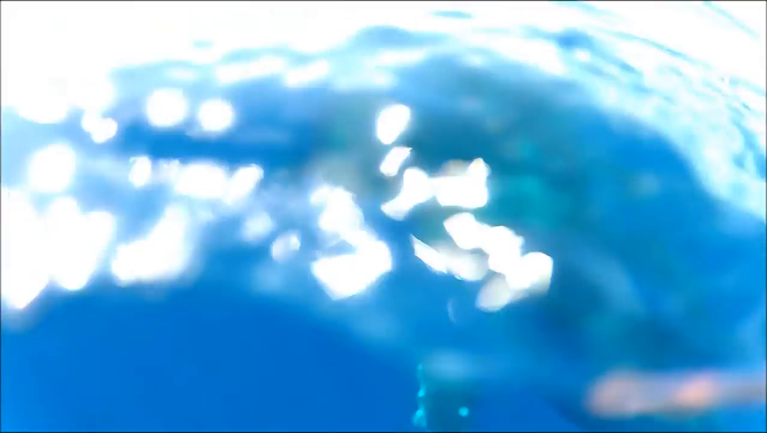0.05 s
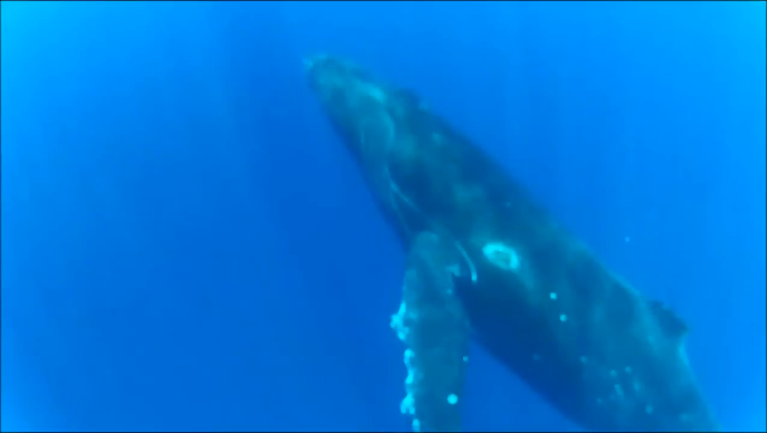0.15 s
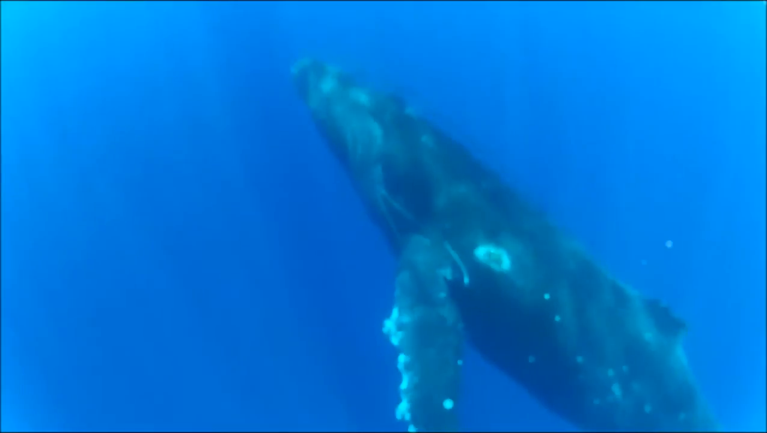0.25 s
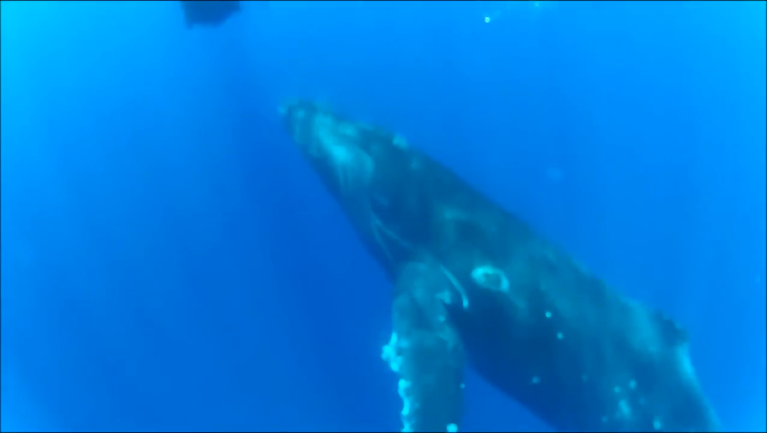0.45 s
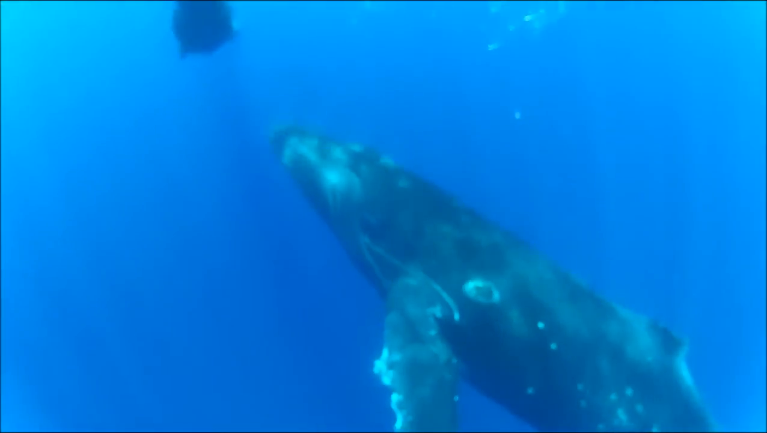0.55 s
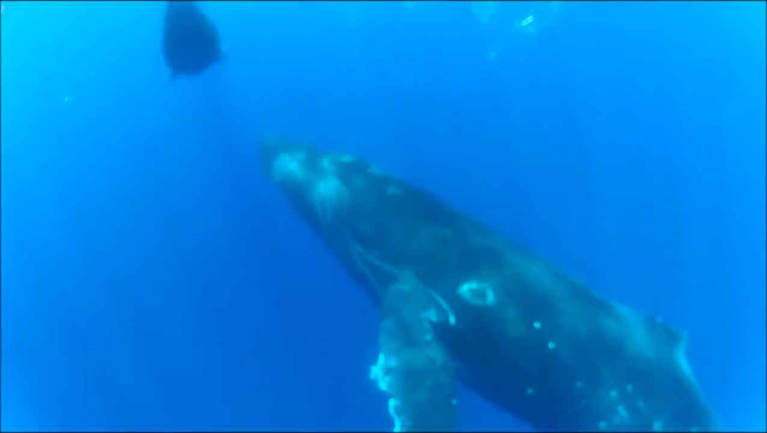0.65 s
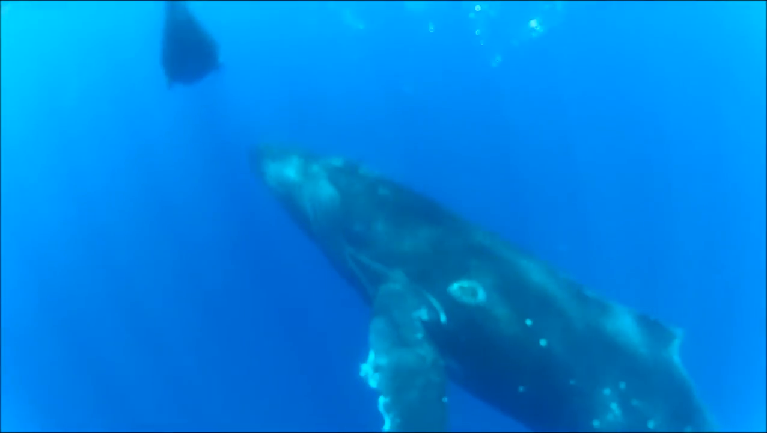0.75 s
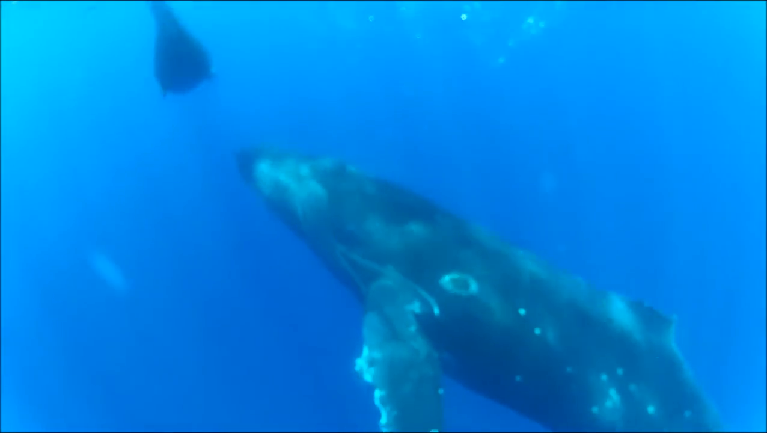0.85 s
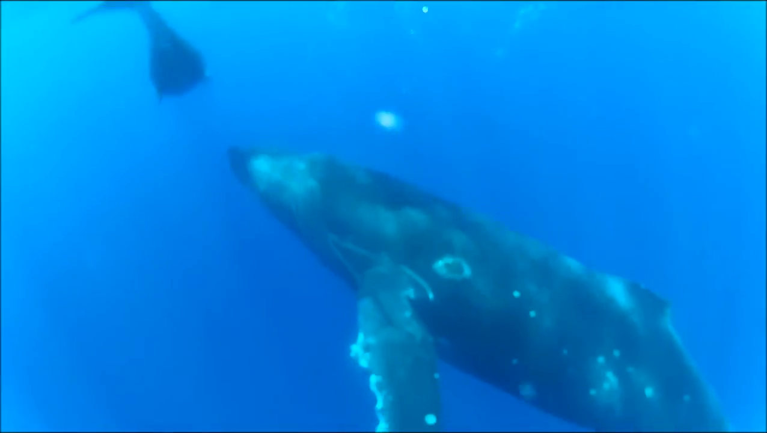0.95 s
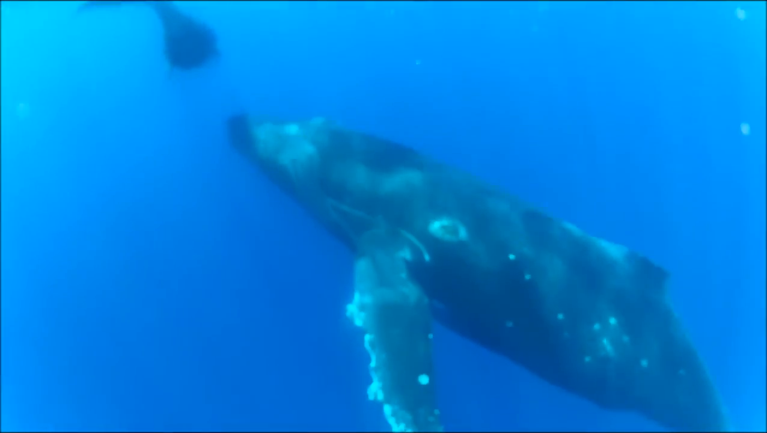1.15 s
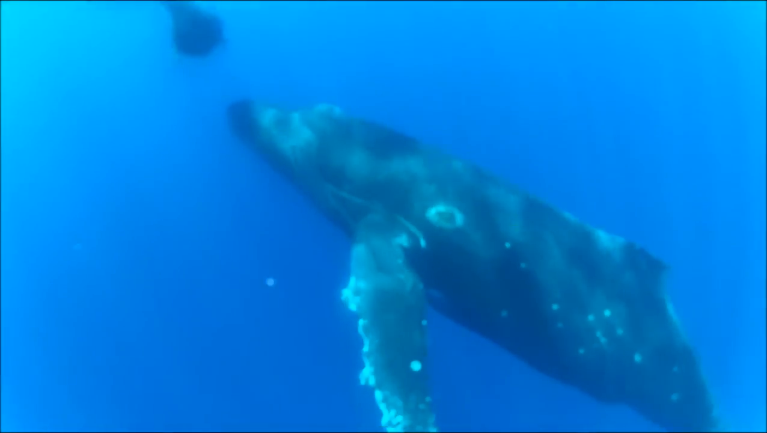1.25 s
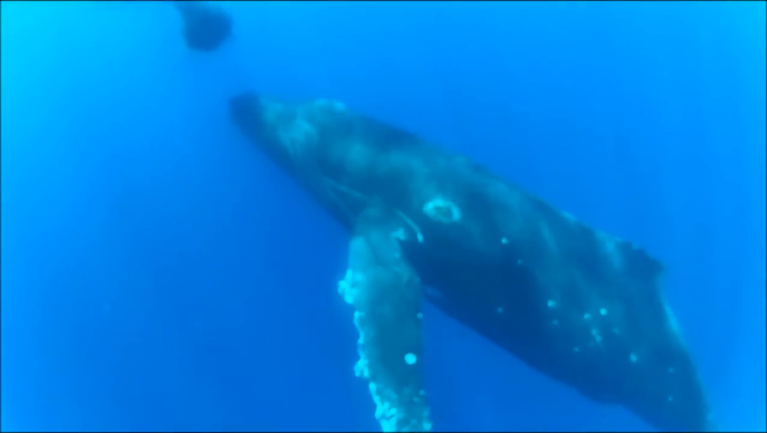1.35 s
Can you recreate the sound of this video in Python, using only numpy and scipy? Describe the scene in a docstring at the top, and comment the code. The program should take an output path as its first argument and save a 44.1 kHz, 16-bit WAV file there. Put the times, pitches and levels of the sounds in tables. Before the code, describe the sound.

Loud, glassy water plops and knocks hit a waterproof camera case as it is dipped into the sea. After half a second they give way to a quiet, low underwater wash with faint fizz, lone bubbles and ticks.

```python
"""Loud, glassy plops and knocks for half a second, then a low wash, faint fizz, lone bubbles and ticks.
A camera in a waterproof housing is dipped into the sea: trapped air pinches off as ringing bubbles,
water knocks on the case and shoves it. The recorder rounds the peaks and holds each sample
at a low rate, which gives every plop its glassy mirror tone."""
import sys
import numpy as np
from scipy import signal
from scipy.fft import rfft, irfft
from scipy.io import wavfile

SR = 44100
rng = np.random.default_rng(int(sys.argv[2]) if len(sys.argv) > 2 else 0)


def master_out(mix):
    """Clip the mix to full scale and print it as 16-bit PCM to the path in sys.argv[1]."""
    frames = np.transpose(np.atleast_2d(mix))
    ceiling = np.clip(frames, -1, 1)
    pcm = np.round(ceiling * 32767).astype(np.int16)
    wavfile.write(sys.argv[1], SR, pcm)


N = 61739
T = np.arange(N) / SR


def undb(db):
    """Decibels to gain."""
    return 10 ** (np.asarray(db) / 20)


def unit(x):
    """Scale to rms 1."""
    return x / np.sqrt(np.mean(x ** 2))


def curve(points):
    """Gain over time from (t/s, level/dB) points."""
    return undb(np.interp(T, *np.array(points).T))


def noise(colour):
    """Noise of rms 1 shaped by (f/Hz, density/dB) points, rolled off below the first."""
    hz, db = np.array(colour).T
    bins_hz = np.maximum(np.fft.rfftfreq(N, 1 / SR), 1)
    shape = undb(np.interp(np.log(bins_hz), np.log(hz), db))
    low_cut = np.minimum(bins_hz / hz[0], 1)
    return unit(irfft(rfft(rng.standard_normal(N)) * shape * low_cut, N))


def add(out, start_s, sound):
    """Mix a sound in at start_s."""
    i = min(max(int(start_s * SR), 0), N)
    out[i:i + len(sound)] += sound[:N - i]


def ring(hz, t60_ms, rise_ms, glide=0):
    """Damped sine, envelope peak 1; pitch slides by the fraction glide over one t60."""
    t_ms = np.arange(6000) * 1000 / SR
    age = t_ms / t60_ms
    envelope = (1 - np.exp(-t_ms / rise_ms)) * np.exp(-np.log(1000) * age)
    pitch_hz = hz * (1 + glide * np.minimum(age, 1))
    return envelope / envelope.max() * np.sin(2 * np.pi * np.cumsum(pitch_hz) / SR)


def sea():
    """Low, slowly heaving wash, plus water churning round the case; stereo."""
    # wash spectrum: f/Hz, relative density/dB
    wash_colour = [(12, -27.5), (20, 0), (64, -2), (81, -3.5), (259, -17.5), (447, -26), (772, -32),
                   (1080, -36.5), (1810, -38.5), (2040, -30.5), (2350, -36.5), (2920, -40.5), (3280, -39.5),
                   (5150, -43.5), (5800, -54.5), (7540, -84), (12800, -120)]
    # wash heave: t/s, gain/dB
    heave = [(0, -4), (.3, 1.5), (.6, 1.5), (.9, 1), (1.0, 0.5), (1.15, 1), (1.4, 2)]
    # churn spectrum: f/Hz, relative density/dB
    churn_colour = [(40, -9), (120, -5), (220, 9), (400, -6.5), (900, -8.5), (2100, -18.5), (3200, -25),
                    (5800, -23.5)]
    # churn envelope: t/s, level/dB
    churn_levels = [(0, -53.5), (.1, -54), (.24, -51), (.34, -57.5), (.44, -56), (.52, -46.5), (.58, -73),
                    (1.1, -72), (1.19, -57.5), (1.26, -72), (1.4, -73.5)]
    wash_db, side_db = -51, -71
    wash = undb(wash_db) * curve(heave) * noise(wash_colour)
    side = undb(side_db) * noise(wash_colour)
    churn = noise(churn_colour) * curve(churn_levels)
    return wash + churn + side * np.array([[1], [-1]])


def fizz():
    """Random swarm of tiny ringing bubbles, loudest while the case goes under."""
    # swarm envelope: t/s, level/dB
    levels = [(0, -49.5), (.04, -48.5), (.11, -60.5), (.2, -57.5), (.33, -55), (.39, -46.5), (.44, -49),
              (.49, -61.5), (.54, -66), (.6, -75.5), (1.0, -77.5), (1.12, -67), (1.19, -55), (1.25, -71.5),
              (1.3, -61), (1.4, -75)]
    count, centre_hz, spread_oct, t60_cycles, scatter_db = 2000, 1850, .51, 12, 4.5
    out = np.zeros(N)
    starts_s = rng.uniform(0, N / SR, count)
    for start_s, (pitch, strength, slide) in zip(starts_s, rng.standard_normal((count, 3))):
        hz = centre_hz * 2 ** (spread_oct * min(pitch, 2))
        bubble = ring(hz, t60_ms=1000 * t60_cycles / hz, rise_ms=.4, glide=.12 * slide)
        add(out, start_s, undb(scatter_db * min(strength, 2)) * bubble)
    return unit(out) * curve(levels)


def foam():
    """Brief hiss as the last pocket of air collapses."""
    # foam spectrum: f/Hz, relative density/dB
    colour = [(300, -3.5), (900, 2.5), (2200, 1), (3500, -2), (5800, -10), (9000, -38.5)]
    start_s, level_db, t60_s = .426, -34, .09
    out = np.zeros(N)
    add(out, start_s, undb(level_db) * noise(colour) * np.exp(-np.log(1000) * T / t60_s))
    return out


def thumps():
    """Water shoves the housing: heavily damped low pressure swings."""
    # shoves: t/s, level/dB, f/Hz, t60/ms
    shoves = [(.0050, -46.5, 218, 140), (.0905, -37.5, 490, 19), (0.2221, -40, 560, 19),
              (0.2589, -34, 236, 25), (0.3, -31.5, 203, 12.4), (0.3556, -14.5, 140, 9.7),
              (0.477, -32, 199, 45), (.4800, -37.5, 327, 20), (0.504, -34.5, 93.3, 23),
              (0.5139, -24, 227.3, 5.3), (0.6255, -32.5, 209.4, 7.4), (0.927, -49, 400, 6.2),
              (1.0530, -44, 150, 20)]
    out = np.zeros(N)
    for start_s, db, hz, t60_ms in shoves:
        add(out, start_s, undb(db) * ring(hz, t60_ms, rise_ms=2))
    return out


def knocks():
    """Water strikes the housing: crack, spit of noise, case ring. Low knocks miss the upper modes."""
    # water impacts: t/s, crack level/dB, crack f/Hz, crack t60/ms, contact/ms
    impacts = [ (0.0121, -40, 3550, 2.7, .1), (.0290, -30, 4640, 2.7, .1),
               (0.0394, -29.5, 5530, 4.9, 0.088), (.0638, -30, 3730, 1.4, 0.087),
               (0.1839, -34, 1850, 4, 0.039), (0.1876, -37, 1780, 6, 0.046), (0.2, -36, 1030, 11, .05),
               (.2175, -49, 3000, 3.4, .1), (0.221, -29.5, 1485, 1.3, 0.045), (.2390, -31, 2040, 3, .1),
               (.2583, -3, 4930, 5.9, 0.1), (.2584, -10, 3550, 9.5, 0.36), (0.3012, -23.5, 900, 4.2, 0.084),
               (0.3088, -14.5, 3760, 8.7, 0.44), (0.309, -12.5, 2620, 6.4, 0.28),
               (0.3215, -37, 3660, 8.1, 0.11), (0.3541, -12.5, 4410, 5.7, .1), (.3550, -17.5, 460, 8, .2),
               (0.4024, -11, 3800, 1.4, 0.062), (.4610, -36, 2200, 3.9, .05), (.4757, -21, 2930, 2.9, 0.46),
               (0.8827, -51.5, 3009, 6, 0.26), (0.9583, -38, 1245, 9.8, .2), (1.0550, -32, 2400, 5, 0.033),
               (1.1840, -30.5, 4004, 7.7, 0.9), (1.1838, -40, 2520, 7.3, .3), (1.2135, -47, 2098, 3, .05),
               (1.3047, -34.5, 1940, 6, .04)]
    # housing modes: f/Hz, relative level/dB, t60/ms
    modes = [(970, -6, 15), (1712, -2.5, 10), (2472, -10, 26), (3830, -6.5, 8.1), (4720, -4.5, 18),
             (4840, -13, 24)]
    case_gain_db, spit_gain_db, spit_t60_ms, hard_contact_ms = -14, -8.5, 20, .1
    out = np.zeros(N)
    for start_s, db, hz, t60_ms, contact_ms in impacts:
        crack = ring(hz, t60_ms, contact_ms)
        reach_hz = 2 * hz  # excitation bandwidth
        case = sum(undb(mode_db) / (1 + (mode_hz / reach_hz) ** 4) * ring(mode_hz, mode_ms, contact_ms)
                   for mode_hz, mode_db, mode_ms in modes)
        lowpass = signal.butter(2, reach_hz, fs=SR, output="sos")
        spit = signal.sosfilt(lowpass, rng.standard_normal(len(case)))
        spit *= np.exp(-np.log(1000) * T[:len(case)] * 1000 / spit_t60_ms)
        spit /= 1 + contact_ms / hard_contact_ms  # hard contacts spit most
        add(out, start_s, undb(db) * (crack + undb(case_gain_db) * case + undb(spit_gain_db) * spit))
    return out


def bubbles():
    """Each air bubble rings as it pinches off; its pitch slides as it moves past the case."""
    # bubbles: t/s, f/Hz, level/dB, t60/ms, pinch-off/ms, glide/fraction per t60
    plops = [ (.0201, 3614, -25.5, 13.6, 1.3, -0.13), (0.0196, 1766, -28.5, 21, 3, 0.41),
             (0.0285, 2470, -27.5, 19, 2.4, 0.021), (0.0307, 1710, -31, 9.5, 0.4, -.3),
             (0.0396, 2110, -18, 11.6, 0.26, 0.26), (0.0387, 2775, -24.5, 24, 0.059, -0.39),
             (0.05, 1860, -16.5, 7, 1.6, -0.28), (.0505, 2100, -25.5, 21, 2.0, -0.38),
             (0.0566, 924, -22.5, 23, 2.2, 0.15), (.0740, 1450, -42.5, 20, 0.82, -0.46),
             (.0903, 1710, -12, 8.9, 2.2, -0.23), (0.0936, 1620, -29.5, 16, 0.72, 0.25),
             (0.1441, 1620, -28, 2.7, 0.52, -0.079), (.1486, 2096, -29.5, 32, .1, -0.012),
             (0.258, 1007, -11.5, 13.4, 0.6, 0.24), (0.2787, 1740, -30, 10.4, 0.71, 0.61),
             (0.321, 1870, -35.5, 11, 1.2, .15), (.3543, 1840, 7, 10.2, 0.92, -0.13),
             (.3560, 948, -2.5, 14.6, 0.34, -0.15), (0.377, 2260, -28, 11, 0.883, 0.42),
             (0.3769, 1379, -32, 5.8, 1.5, -0.16), (.3870, 937, -34.5, 17, 0.4, -0.18),
             (0.3948, 1090, -30, 8.7, .6, .1), (.4023, 940, -27, 13, 0.43, 0.47),
             (0.4201, 755, -8, 14.7, 1.2, -0.75), (0.4194, 1770, -18.5, 13, 2.0, .5),
             (.4250, 561, -17, 34, 0.85, .15), (.4256, 2392, -9.5, 17, 0.37, -0.0064),
             (0.4272, 2238, -0.5, 6.6, 1.8, -0.74), (0.43, 1710, -24, 25, 0.36, 0.3),
             (0.4367, 2430, -24.5, 8, 0.52, 0.15), (0.4466, 1010, -38.5, 55, 1.5, -0.4),
             (0.4755, 2420, -7.5, 2.9, 2.0, -0.31), (0.4774, 2830, -18, 8.9, 0.56, 0.43),
             (0.4784, 2350, -20.5, 20, 0.24, -0.078), (0.5103, 2235, -23, 27, .6, -0.42),
             (0.613, 1930, -53.5, 40, 2.6, -.05), (0.6244, 1140, -29, 68, .15, -0.066),
             (0.7727, 2560, -47, 6.1, 0.14, 0.13), (.7740, 770, -58, 56, 2.0, 0.3),
             (.8010, 2247, -40.5, 19, 1.1, 0.024), (0.9272, 1274, -27, 66, 2.7, 0.26),
             (.9280, 1515, -34, 61, 0.22, 0.14), (0.929, 2190, -45, 47, 0.43, 0.15),
             (.9280, 824, -45.5, 36, 0.23, 0.035), (1.0380, 2210, -50.5, 50, 1.5, -0.6),
             (1.037, 1390, -53, 26, 1.94, .1), (1.1835, 2020, -39, 31, 1.5, 0.041),
             (1.1839, 860, -40, 28, 0.18, -0.028), (1.1956, 1640, -41.5, 30, 2.0, 0.035),
             (1.233, 3660, -52, 22, 0.93, -.03), (1.2670, 2164, -44.5, 19.6, 1.2, -0.05),
             (1.2990, 3730, -46.5, 20.4, 2, -0.025), (1.3036, 729, -38.5, 14, 0.16, .41)]
    out = np.zeros(N)
    for start_s, hz, db, t60_ms, rise_ms, glide in plops:
        add(out, start_s, undb(db) * ring(hz, t60_ms, rise_ms, glide))
    return out


def scene():
    """All sources summed at the microphone, nearly mono."""
    return sea() + fizz() + foam() + thumps() + knocks() + bubbles()


def record(dry):
    """Recorder: soft clip, sample-and-hold (mirror tones in the treble), hard clip, hiss, low-pass."""
    soft_limit, hard_limit = .78, .87
    hold_hz, top_hz, hiss_db = 12000, 15400, -79.5
    rounded = dry / (1 + (dry / soft_limit) ** 6) ** (1 / 6)
    low_rate = signal.resample_poly(rounded, hold_hz, SR, axis=1, window=("kaiser", 5))
    stairs = np.repeat(low_rate, 4, axis=1)
    held = signal.resample_poly(stairs, SR, 4 * hold_hz, axis=1)[:, :N]
    hiss = undb(hiss_db) * (rng.standard_normal(N) + .3 * rng.standard_normal((2, N)))
    lowpass = signal.ellip(10, .2, 95, top_hz, fs=SR, output="sos")
    return signal.sosfilt(lowpass, np.clip(held, -hard_limit, hard_limit) + hiss)


dry = scene()
out = record(dry)
master_out(out)
```